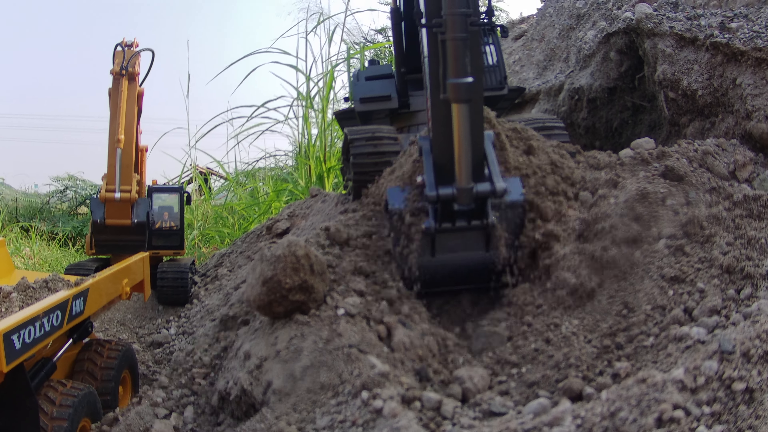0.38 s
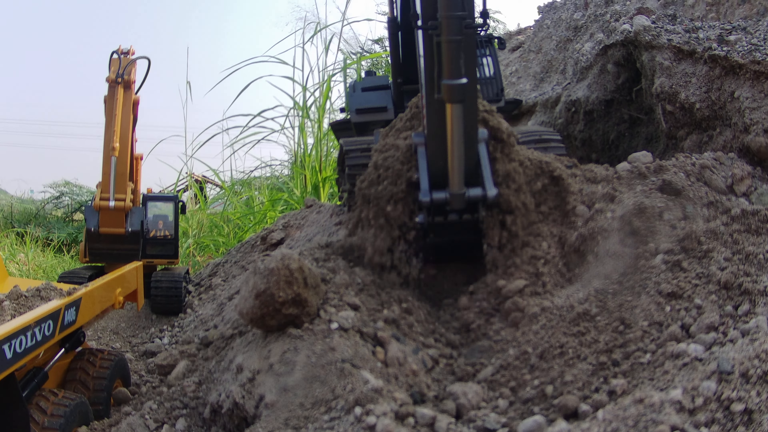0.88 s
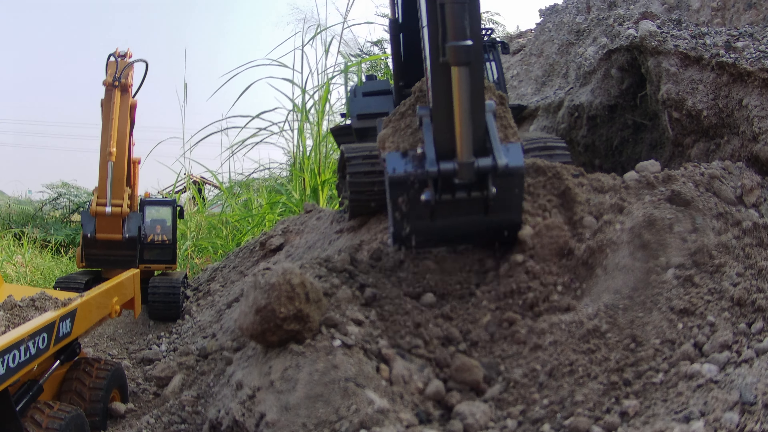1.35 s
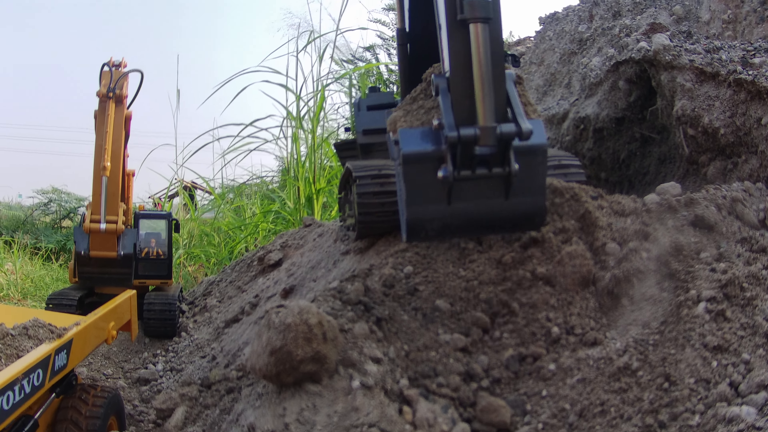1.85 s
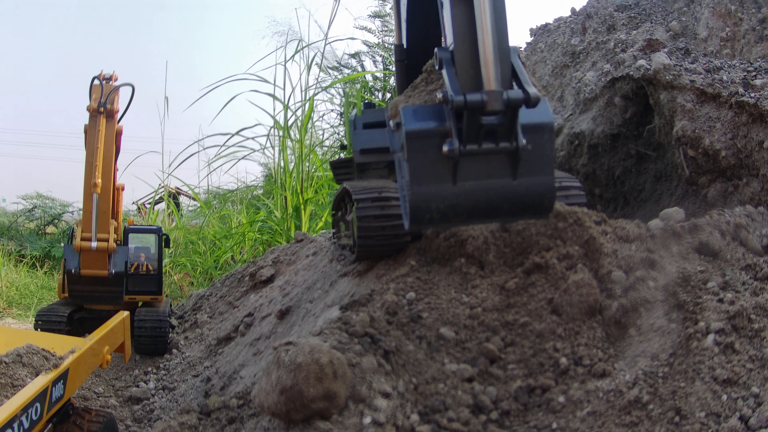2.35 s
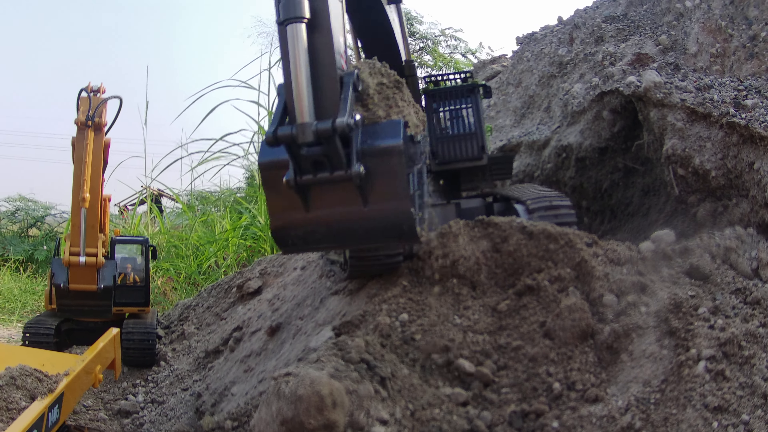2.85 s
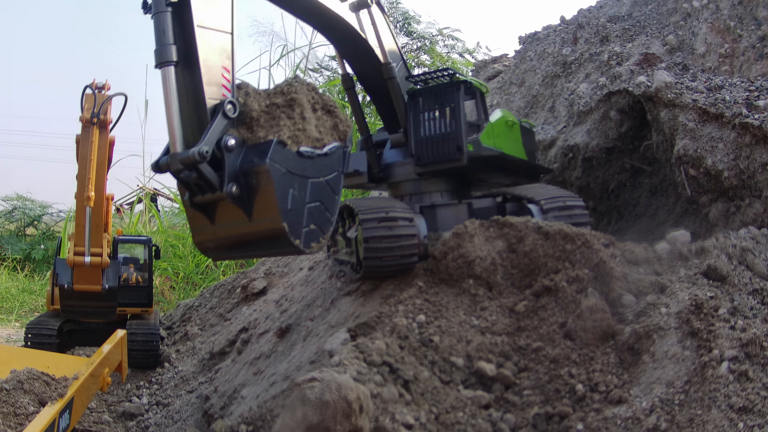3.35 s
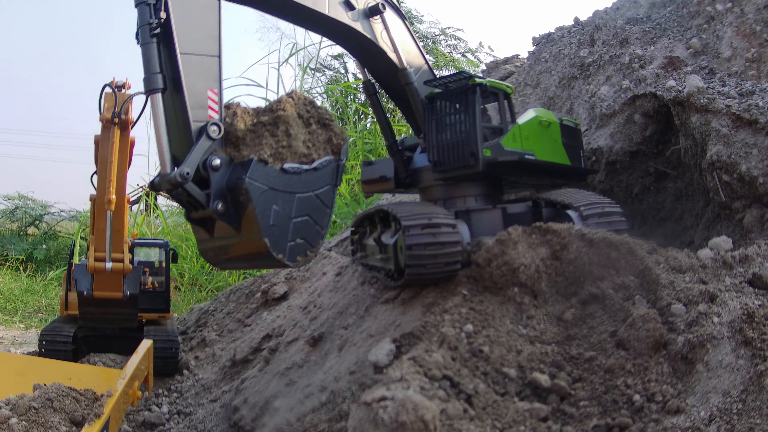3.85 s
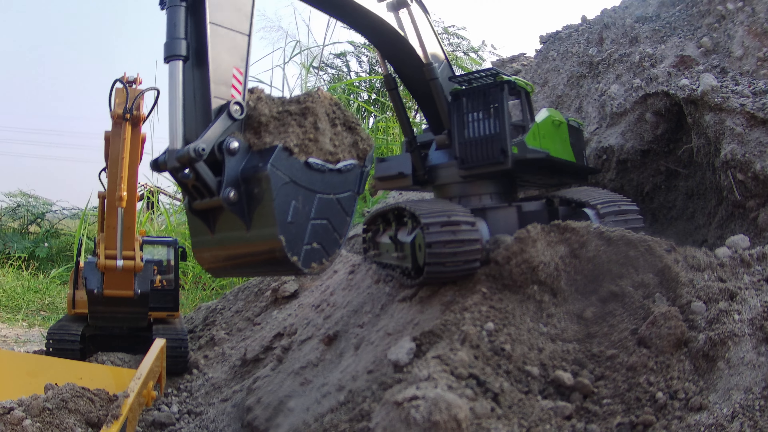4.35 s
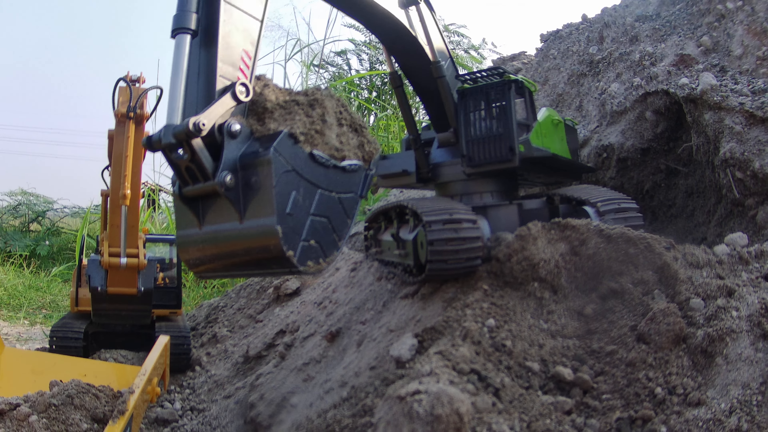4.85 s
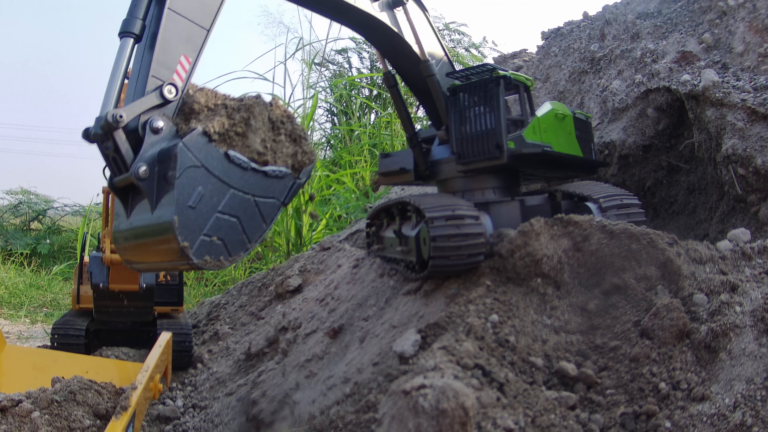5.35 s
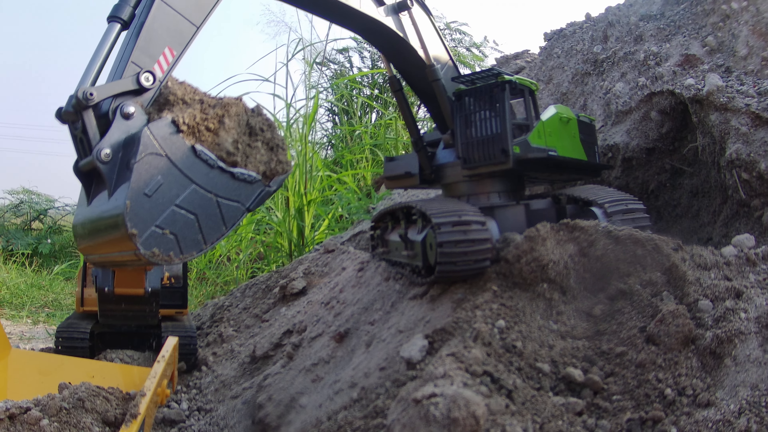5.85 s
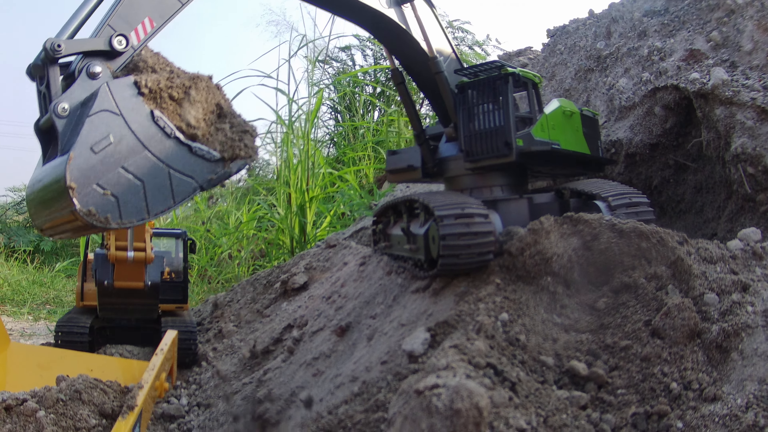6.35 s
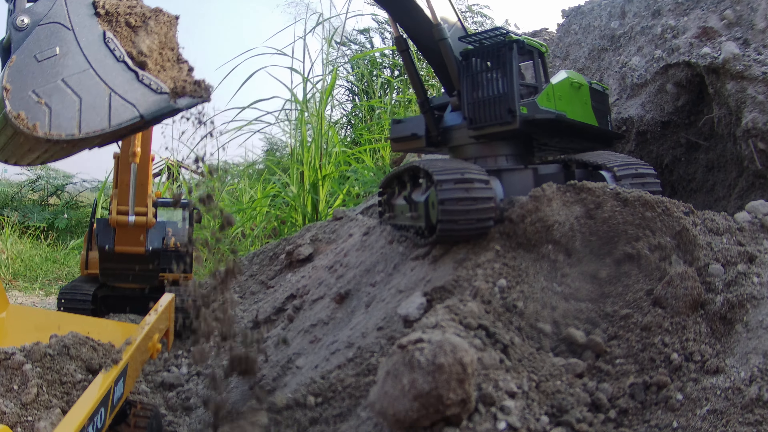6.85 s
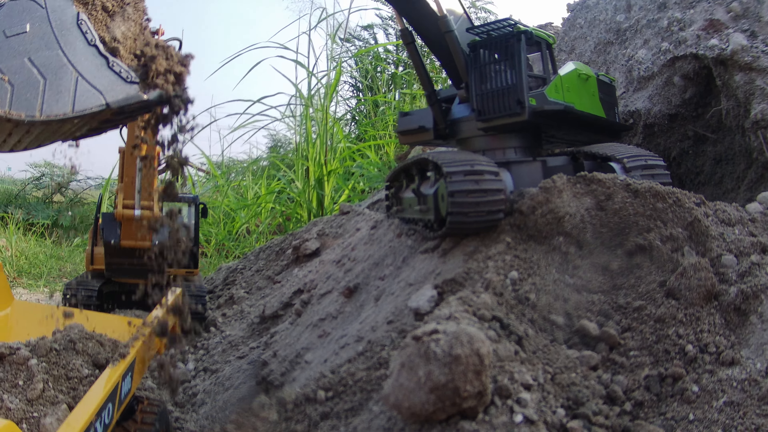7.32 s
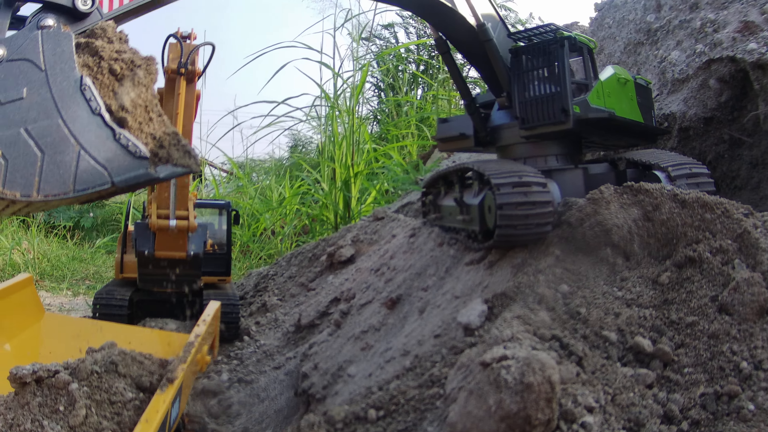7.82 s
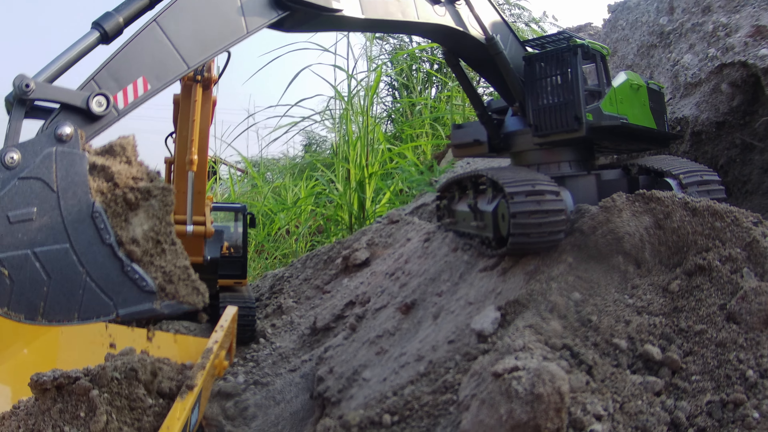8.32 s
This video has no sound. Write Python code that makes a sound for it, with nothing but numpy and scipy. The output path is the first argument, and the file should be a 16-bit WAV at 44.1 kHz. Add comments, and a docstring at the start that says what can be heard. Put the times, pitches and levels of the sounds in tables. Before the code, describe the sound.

A toy digger's plastic gears rasp and squeal briefly, then its little motors whirr on and off, with tiny ticks over faint open air.

```python
"""Small three-pole gear motors of a toy excavator run in turn and in pairs as it digs, swings and tips loose soil.
The motors whine on multiples of their shaft speed: sums of wavering sines that follow each spin-up and coast.
Their plastic gears rattle and grind: filtered noise that swells in time with the pinion.
The gears squeal while digging, a trembling tone and its octave; joints and pebbles tick as short rings.
Faint steady tones, dull frame rumbles and outdoor air, made of coloured noise, lie below."""
import sys
import numpy as np
from scipy import signal
from scipy.io import wavfile
from scipy.ndimage import uniform_filter1d

SR = 44100
rng = np.random.default_rng(int(sys.argv[2]) if len(sys.argv) > 2 else 0)


def volts(x):
    """Linear amplitude factor 10**(x/20) for a level x in dB, scalar or array-like."""
    e = np.asarray(x, float) / 20
    return 10 ** e


def master(y):
    """Save y as 16-bit WAV."""
    cut = np.clip(np.atleast_2d(y).T, -1, 1)
    pcm = np.round(cut * 32767)  # scale
    wavfile.write(sys.argv[1], SR, pcm.astype(np.int16))


N = 383669


def evened(x):
    """Scales to rms 1."""
    return x / np.sqrt(np.mean(x ** 2) + 1e-20)


def read(points, hz):
    """Reads a spectrum on a log-frequency axis."""
    f, value = np.transpose(points)
    return np.interp(np.log(hz + 1), np.log(f + 1), value)


def add(mix, s, sound):
    """Mixes a sound in at time s."""
    part = mix[round(s * SR):][:len(sound)]
    part += sound[:len(part)]


def wander(count, hz):
    """Random drift through hz fresh normal values a second, joined by straight lines."""
    return np.interp(np.arange(count) * hz / SR, np.arange(800), rng.standard_normal(800))


def coloured(x, points):
    """Causal minimum-phase filter with the given spectrum."""
    level_db = np.maximum(read(points, abs(np.fft.fftfreq(4096, 1 / SR))), -100)
    log_gain = np.log(volts(level_db))
    taps = np.fft.ifft(np.exp(np.conj(signal.hilbert(log_gain)))).real[:2048]
    return signal.oaconvolve(x, taps)[:len(x)]


def softened(sound):
    """Fades of 300 samples, about 7 ms, at both ends."""
    ramp = np.sqrt(np.minimum(np.arange(len(sound)) / 300, 1))
    return sound * ramp * ramp[::-1]


def air():
    """Distant outdoor murmur of wind and leaves: coloured noise with a wandering level."""
    # colour of the air: f/Hz, relative level/dB
    air_colour = [(30, -41.5), (130, -10), (200, -16), (400, -1.5), (800, -0.5), (1500, -11.5),
                  (2050, -13.5), (2250, -1.5), (2500, -1.5), (4000, -11.5), (7500, -16), (11000, -21.5),
                  (15700, -31)]
    murmur = evened(coloured(rng.standard_normal(N), air_colour))
    return volts(-82.5 + 2.7 * wander(N, 7.2)) * murmur


def faint_tones():
    """Faint, nearly steady tones that come and go, drifting a little in pitch and level."""
    # tones: start t/s, end t/s, f/Hz, middle level/dB
    tone_rows = [(2.7, 3.6, 810, -84), (3.95, 5.15, 860, -85), (3.2, 5, 2200, -87)]
    for start, end, hz, db in tone_rows:
        count = round((end - start) * SR)
        drift = .005 * wander(count, 3.4) + .012 * wander(count, 90)
        angle = 2 * np.pi * np.cumsum(hz * (1 + drift)) / SR
        level_db = db + 2.5 * wander(count, 4) + 2.0 * wander(count, 13)
        yield start, np.sqrt(2) * volts(level_db) * np.cos(angle) * signal.windows.tukey(count, .2)


def rumbles():
    """Dull rumbles while the frame settles: band-limited noise faded at both ends."""
    # rumbles: start t/s, end t/s, level/dB
    rumble_rows = [(0.659, 1.028, -82), (3.556, 4.017, -79.5)]
    band = signal.butter(3, [420, 760], "band", fs=SR, output="sos")
    for start, end, db in rumble_rows:
        count = round((end - start) * SR)
        noise = evened(signal.sosfilt(band, rng.standard_normal(count)))
        yield start, volts(db) * noise * signal.windows.tukey(count, .3)


def tick(db, hz, t60, crack):
    """A decaying ring with a soft start and a crack of noise near its pitch."""
    t = np.arange(3000) / SR
    noise = signal.lfilter(*signal.butter(2, [hz / 3, hz * 2], "band", fs=SR), rng.standard_normal(3000))
    decay = volts(db - 60 * t / t60) * (1 - np.exp(-t * hz))
    return decay * (np.sin(2 * np.pi * hz * t) + crack * noise)


def joints_and_pebbles():
    """Short noisy ticks, and longer, purer knocks."""
    # ticks: t/s, ring level before decay/dB, f/Hz
    tick_rows = [(5.1012, -45, 3520), (7.6403, -39, 4210), (7.7676, -34, 4077), (8.4693, -37, 4100),
                 (8.5954, -30.5, 3330)]
    # knocks: t/s, ring level before decay/dB, f/Hz
    knock_rows = [(3.87, -61, 2280), (6.374, -50.5, 920)]
    for s, db, hz in tick_rows:
        yield s, tick(db, hz, t60=0.011, crack=1.3)
    for s, db, hz in knock_rows:
        yield s, tick(db, hz, t60=0.026, crack=.1)


def spells(tables, spin_up_s, coast_hz_per_s, power, start_hz=1.):
    """Each spell: the shaft eases up to its driven speed, then coasts until it stops or is driven again."""
    stick_share, stick_db = 0.31, -23  # below this share of the driven speed the gears stick and fall silent
    keep = np.exp(-1 / (spin_up_s * SR))
    next_starts = [table[0][0] for table in tables[1:]] + [np.inf]
    for rows, again in zip(tables, next_starts):
        s, hz, db = np.transpose(rows)
        stop = min(again + 300 / SR, s[-1] + hz[-1] / coast_hz_per_s)  # 300 samples overlap the next spell
        t = np.arange(s[0], stop, 1 / SR)
        driven = np.interp(t, s, hz)
        shaft_hz = signal.lfilter([1 - keep], [1, -keep], driven, zi=[keep * start_hz])[0]
        shaft_hz = np.maximum(shaft_hz - coast_hz_per_s * np.maximum(t - s[-1], 0), 1)
        start_hz = shaft_hz[-1]
        share = shaft_hz / driven
        short_db = 20 * np.log10(np.minimum(share, 1))  # how far below the driven speed
        # gear noise grows as this power of the speed reached
        sag_db = power * short_db + stick_db * np.maximum(1 - share / stick_share, 0)
        yield t, shaft_hz, short_db, np.interp(t, s, db) + sag_db, sag_db


def gears(shaft_hz, rattle_db, grind_db, box, throb_db, buzz_db, grit_db, flutter_db, panels=()):
    """Dense tooth impacts of uneven size swell with each pinion turn and each commutator step."""
    shaft_per_pinion = 2.53  # gear ratio of the first stage
    count = len(shaft_hz)
    turns = np.cumsum(shaft_hz) / SR
    pinion = 2 * np.pi * (turns / shaft_per_pinion + .07 * wander(count, 30))
    throb_db = throb_db * np.clip(112 / shaft_hz, 1, 1.6)  # slow gears knock harder through their play
    pinion_db = throb_db * (np.cos(pinion) + 0.27 * np.cos(2 * pinion))
    commutator_db = buzz_db * np.cos(2 * np.pi * 3 * turns)
    bursts = uniform_filter1d(rng.exponential(1, count // 40 + 1), size=2)
    bursts = bursts.repeat(40)[:count]  # steps of about 1 ms
    uneven_db = flutter_db * wander(count, 10.23) + grit_db * bursts
    impacts = rng.standard_normal(count) * volts(pinion_db + commutator_db + uneven_db)
    sound = coloured(impacts, box)
    for hz, width, ring_db in panels:
        sound = sound + volts(ring_db) * signal.lfilter(*signal.iirpeak(hz, hz / width, fs=SR), sound)
    # grind below 4 kHz, rattle above
    low = signal.sosfiltfilt(signal.butter(3, 4000, fs=SR, output="sos"), sound)
    return volts(rattle_db) * evened(sound - low) + volts(grind_db) * evened(low)


def whine(shaft_hz, whine_db, orders):
    """Sines on multiples of the shaft speed, each wavering on its own."""
    angle = 2 * np.pi * np.cumsum(shaft_hz) / SR
    lines = 0
    for k, db in orders:
        level = volts(db + 1.5 * wander(len(angle), 13.65))
        lines = lines + level * np.cos(k * angle + 7 * rng.random())
    return np.sqrt(2) * volts(whine_db) * lines


def motor(spell, levels, whine_power, box, orders, **texture):
    """One spell: the whine grows as a power of the speed reached, over the noise of the gears."""
    t, shaft_hz, short_db, rattle_db, sag_db = spell
    whine_db, grind_db = levels
    tones = whine(shaft_hz, whine_db + whine_power * short_db, orders)
    noise = gears(shaft_hz, rattle_db, grind_db + sag_db, box, **texture)
    return t[0], softened(tones + noise)


def swing():
    """A slow, lightly loaded motor: clean commutator pulses ring the housing up to the top of the treble."""
    # one table a spell of current: t/s, driven shaft speed f/Hz, treble level before trims at full speed/dB
    swing_spells = [
        [(2.68, 86.7, -50), (2.8, 94.8, -63), (2.92, 97.2, -63), (2.97, 91.1, -56), (3.06, 87.1, -55.5),
         (3.19, 85.8, -56.5), (3.28, 90.1, -52), (3.39, 87.4, -51), (3.52, 89.7, -52.5), (3.6, 90.5, -51.5)],
    ]
    # colour of gearbox and housing: f/Hz, relative level/dB
    swing_box = [(400, -43.5), (1060, -5), (1350, -16), (2000, -29.5), (2600, -13), (3050, -16.5),
                 (3700, -6.5), (5000, -22.5), (5750, -8.5), (8600, -6.5), (9300, -14.5), (11000, -18),
                 (12400, -36), (14000, -31), (15700, -32.5)]
    # brightest resonance: t/s, f/Hz
    facing = [(2.73, 7050), (2.81, 5950), (3.06, 8130), (3.19, 7050), (3.4, 7160), (3.6, 6460)]
    for t, shaft_hz, _, rattle_db, sag_db in spells(swing_spells, spin_up_s=.012, coast_hz_per_s=116, power=8.5):
        count = len(shaft_hz)
        # the hum is loudest once the shaft nears a frame resonance: 92 Hz, falling 2.5 dB per Hz below it
        hum_db = -77.5 - 2.5 * np.maximum(92 - shaft_hz, 0)
        facing_hz = np.interp(t, *np.transpose(facing))
        angle = 2 * np.pi * np.cumsum(3 * shaft_hz * (1 + .0008 * wander(count, 200))) / SR
        pulses = 0
        for k in range(2, 54):
            hz = 3 * k * shaft_hz
            facing_db = 11.5 * np.exp(-((hz - facing_hz) / 700) ** 2)  # the bright side moves as the body turns
            level = volts(read(swing_box, hz) + facing_db + 3.5 * wander(count, 12))
            pulses = pulses + level * np.cos(k * angle + 7 * rng.random())
        pulses = pulses / np.sqrt(uniform_filter1d(pulses ** 2, size=3000) + 1e-20)  # steady power
        hum = np.sqrt(2) * volts(hum_db) * np.cos(angle)
        running = np.clip((3.655 - t) / 0.037, 0, 1)  # the current stops, the gears coast
        noise = gears(shaft_hz, rattle_db - 6 - 5 * running, -73.5 + sag_db, swing_box,
                      throb_db=0.3, buzz_db=0.0, grit_db=2.5, flutter_db=2)
        yield t[0], running * (volts(rattle_db - 5.5) * pulses + hum) + noise


def boom():
    """The fast boom motor: a rich whine of many shaft orders over its gears."""
    # one table a spell of current: t/s, driven shaft speed f/Hz, gear rattle at full speed level/dB
    boom_spells = [
        [(1.03, 126.2, -52), (1.66, 124.2, -53), (2.48, 123.9, -53.5)],
    ]
    # a row a spell, at full speed: whine level/dB, frame grind level/dB
    boom_levels = [(-63.5, -56)]
    # whine lines: multiple of the shaft speed, relative level/dB
    boom_orders = [(3, -14), (6, -16), (7, -18), (8, -17), (9, 0), (11, -6.5), (12, -1), (13, -15),
                   (15, -5), (16, -6), (17, -1), (18, -23), (20, -8.5), (21, -9.5), (23, -11), (24, 1),
                   (27, -8.5), (41, -23), (42, -3.5)]
    # colour of gearbox and housing: f/Hz, relative level/dB
    boom_box = [(240, -41), (400, -32.5), (519, -26.5), (811, -20), (1100, -7), (1280, -12.5), (2070, -9),
                (2340, -10.5), (2900, -6.5), (4810, -8), (5280, -6.5), (6750, -6.5), (8630, -3),
                (10400, -4.5), (15700, -40)]
    panels = [(5150, 250, 1), (8600, 500, -2)]  # f/Hz, width/Hz, level/dB
    runs = spells(boom_spells, spin_up_s=.066, coast_hz_per_s=385, power=.85)
    for spell, levels in zip(runs, boom_levels):
        yield motor(spell, levels, 3.5, boom_box, boom_orders,
                    throb_db=1.2, buzz_db=1.5, grit_db=.8, flutter_db=.25, panels=panels)


def arm():
    """The arm motor: strongly throbbing gears ring the housing panels as the arm unfolds and stretches."""
    # one table a spell of current: t/s, driven shaft speed f/Hz, gear rattle at full speed level/dB
    arm_spells = [
        [(3.97, 112.7, -43.5), (4.5, 116.2, -45.5), (4.8, 115, -48), (5.01, 111.3, -45)],
        [(5.045, 112.2, -45.5), (5.17, 108.8, -45.5)],
        [(5.3, 105.6, -45.5), (5.68, 116.6, -44), (7.11, 105.8, -43.5)],
        [(7.17, 97.8, -46.5), (7.37, 105.3, -44), (7.93, 107, -45)],
        [(8.1, 57, -54), (8.32, 75.5, -50.5), (8.54, 112, -48.5), (8.7, 114.4, -39.5)],
    ]
    # a row a spell, at full speed: whine level/dB, frame grind level/dB
    arm_levels = [(-81.5, -61), (-81.5, -62.5), (-76, -59), (-80, -58.5), (-99, -58.5)]
    # whine lines, one table each for arm folded, open and stretched: multiple of shaft speed, relative level/dB
    folded, opened, stretched = [
        [(3, 3.5), (6, -2), (12, 0)],
        [(3, -2), (10, -5), (12, 2.5), (48, 4.5), (60, 11)],
        [(3, 0)],
    ]
    # colour of gearbox and housing: f/Hz, relative level/dB
    arm_box = [(240, -46.5), (400, -35.5), (990, -33), (1330, -17.5), (1450, -24), (2530, -18),
               (2900, -24.5), (3280, -17.5), (3820, -17.5), (4530, -12.5), (5530, -11), (8240, 4),
               (11500, -10.5), (13300, -20), (15700, -26.5)]
    # the same gearbox with the arm still folded: f/Hz, relative level/dB
    reach_box = [(240, -44.5), (400, -30.5), (634, -33.5), (685, -33), (889, -30.5), (1350, -18.5),
                 (2130, -21), (4260, -14.5), (4530, -15), (8240, 0.5), (11200, -12), (15700, -34)]
    # ringing panels of the arm housing: f/Hz, width/Hz, level/dB
    arm_panels = [(4600, 200, 2), (6650, 300, -3), (8300, 600, -6), (11300, 600, -2)]
    # the lowest panel rings higher with the arm stretched out: f/Hz, width/Hz, level/dB
    stretched_panel = (4850, 250, 5.8)
    runs = spells(arm_spells, spin_up_s=.08, coast_hz_per_s=260, power=1.3)
    boxes = (reach_box, reach_box, arm_box, arm_box, arm_box)
    poses = (folded, folded, opened, opened, stretched)
    for spell, levels, box, orders in zip(runs, arm_levels, boxes, poses):
        panels = [stretched_panel, *arm_panels[1:]] if orders is stretched else arm_panels
        yield motor(spell, levels, 8.7, box, orders,
                    throb_db=2.6, buzz_db=1, grit_db=1.8, flutter_db=.7, panels=panels)


def tip():
    """The tipping motor: whine on multiples of three times the shaft speed over gritty gears."""
    # one table a spell of current: t/s, driven shaft speed f/Hz, gear rattle at full speed level/dB
    tip_spells = [
        [(7.14, 85, -49), (7.255, 90.4, -51.5)],
        [(7.26, 128, -51), (7.9, 128.8, -45.5), (8.0, 130.4, -49.5), (8.4, 130.5, -48.5), (8.62, 116.9, -43.5),
         (8.7, 115.4, -46.5)],
    ]
    # a row a spell, at full speed: whine level/dB, frame grind level/dB
    tip_levels = [(-84, -60.5), (-65.5, -60.5)]
    # whine lines: multiple of the shaft speed, relative level/dB
    tip_orders = [(3, -3.5), (6, -7), (9, 1), (12, -5.5), (15, -10.5), (18, -26), (21, -9), (24, -6.5)]
    # colour of gearbox and housing: f/Hz, relative level/dB
    tip_box = [(240, -27.5), (400, -27.5), (459, -14.5), (774, -5), (1090, -9), (1170, 2), (1720, -7.5),
               (2410, -4.5), (3590, -11.5), (4670, -16), (8760, -9.5), (10500, -14), (15700, -64)]
    runs = spells(tip_spells, spin_up_s=.055, coast_hz_per_s=340, power=0.39)
    for spell, levels in zip(runs, tip_levels):
        yield motor(spell, levels, 2.8, tip_box, tip_orders,
                    throb_db=0.7, buzz_db=-4.0, grit_db=2.4, flutter_db=-1.4, panels=[(4640, 610, 1.0)])


def squeal_db(t, column, swell_db_per_s):
    """Each squeal catches fast, swells to its end and lets go."""
    # squeals of the digging mesh: start t/s, end t/s, tone drive at the end level/dB, octave at the end level/dB
    squeal_rows = [(0.0, 0.005, -57, -44.5), (0.348, 0.38, -70, -78), (0.539, 0.772, -55.5, -46.5),
                   (0.82, 0.856, -71, -90)]
    curves = []
    for row in squeal_rows:
        start, end = row[:2]
        swell_db = swell_db_per_s * np.maximum(end - t, 0)
        catch_db = 302 * np.maximum(start - t, 0)
        let_go_db = 653 * np.maximum(t - end, 0)
        curves.append(row[column] - swell_db - catch_db - let_go_db)
    return np.max(curves, axis=0)


def dig():
    """Under load the tooth mesh squeals: a trembling tone and its octave, gliding with the shaft speed."""
    # one table a spell of current: t/s, driven shaft speed f/Hz, gear rattle at full speed level/dB
    dig_spells = [
        [(0.0, 99.3, -40), (0.114, 96.2, -40.5), (0.25, 92, -43.5), (0.345, 87.4, -48.5)],
        [(0.41, 98.2, -51), (0.45, 98.5, -46.5), (0.536, 98.2, -46), (0.795, 98.5, -48)],
    ]
    # squeal lines: multiple of the shaft speed, relative level/dB
    dig_orders = [(3, -29.5), (19, -14.5), (24, 0.5), (25, -4)]
    # colour of gearbox and housing: f/Hz, relative level/dB
    dig_box = [(150, -93), (250, -37), (372, -61), (392, -34.5), (545, -29), (660, -23.5), (1170, -16.5),
               (1340, -14.5), (1930, -15), (2100, -12.5), (5180, -11.5), (6270, -9), (7720, -4), (9670, 1),
               (15700, -27.5)]
    runs = spells(dig_spells, spin_up_s=0.02, coast_hz_per_s=572, power=0.55,
                  start_hz=dig_spells[0][0][1])  # already turning at the start
    for t, shaft_hz, _, rattle_db, sag_db in runs:
        count = len(shaft_hz)
        mesh_db = np.maximum(squeal_db(t, column=2, swell_db_per_s=27), -86 + sag_db)  # never below a quiet mesh
        octave_db = squeal_db(t, column=3, swell_db_per_s=50)
        tremble = 0.009 * wander(count, 150) + 0.0076 * wander(count, 25)
        angle = 2 * np.pi * np.cumsum(shaft_hz * (1 + tremble)) / SR
        lines = sum(volts(db + 2 * wander(count, 88.4)) * np.cos(k * angle) for k, db in dig_orders)
        rasp = 1 + .7 * np.cos(2 * angle + 1.5 * wander(count, 60))  # the worn pinion chops the octave
        squeal = volts(mesh_db) * lines + volts(octave_db) * rasp * np.cos(48 * angle)
        noise = gears(shaft_hz, rattle_db, -62.5 + sag_db, dig_box,
                      throb_db=0.26, buzz_db=-1.5, grit_db=1.4, flutter_db=1.1, panels=[(6020, 420, 7)])
        yield t[0], softened(np.sqrt(2) * squeal + noise)


def scene():
    """The motors and the small sounds of joints and frame, over outdoor air."""
    mix = np.zeros(N)
    for source in (dig, boom, swing, arm, tip, faint_tones, rumbles, joints_and_pebbles):
        for start, sound in source():
            add(mix, start, sound)
    # steep high-pass at 230 Hz: little bass in the machine sounds
    machine = signal.sosfilt(signal.butter(4, 230, "high", fs=SR, output="sos"), mix)
    return (machine + air())[None]


def roll_off(x):
    """The treble ends steeply here."""
    return signal.sosfilt(signal.butter(12, 15850, fs=SR, output="sos"), x)


def record(dry):
    """Delivers the finished mix."""
    return roll_off(dry)


dry = scene()
out = record(dry)
master(out)
```